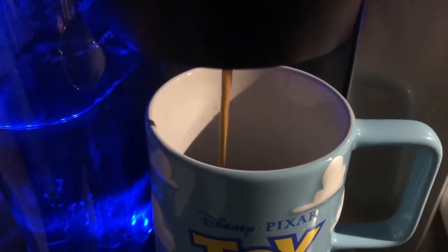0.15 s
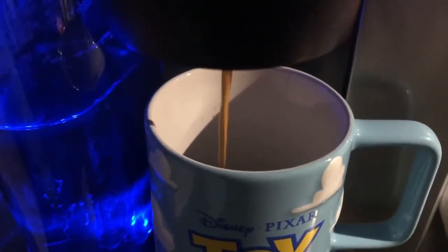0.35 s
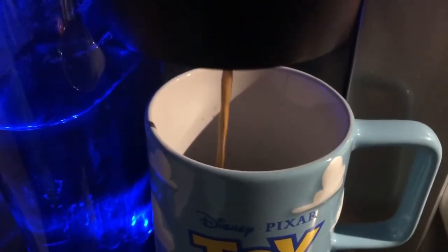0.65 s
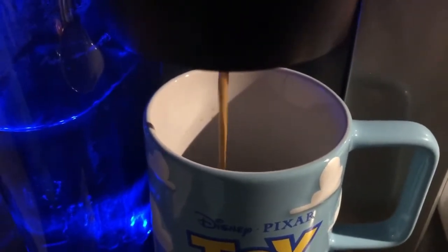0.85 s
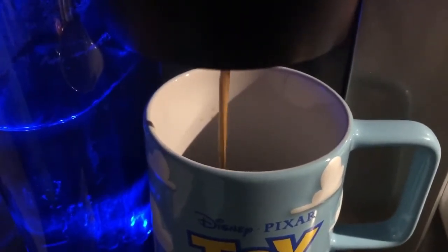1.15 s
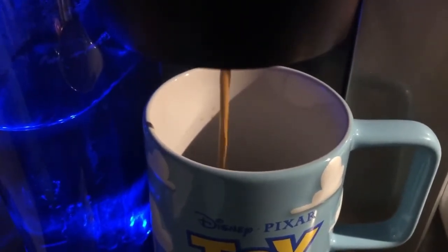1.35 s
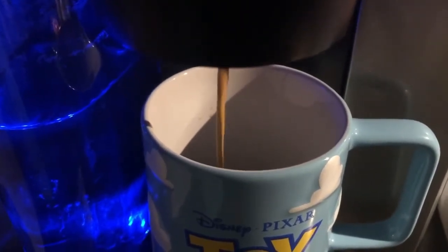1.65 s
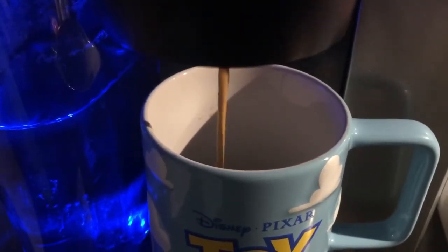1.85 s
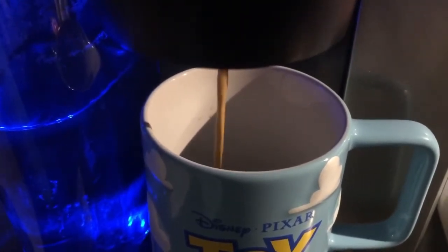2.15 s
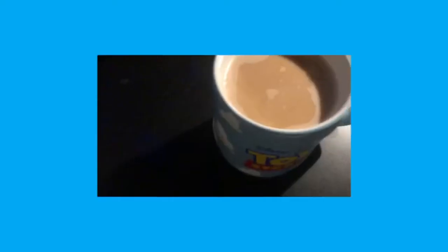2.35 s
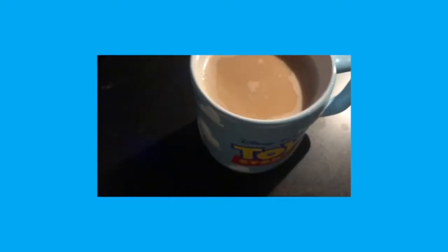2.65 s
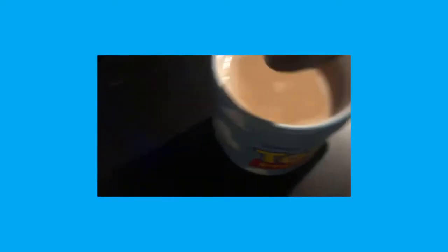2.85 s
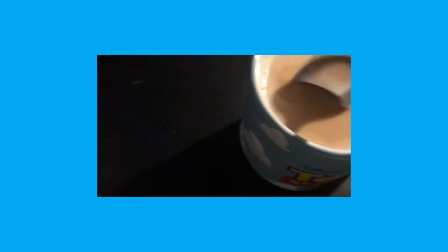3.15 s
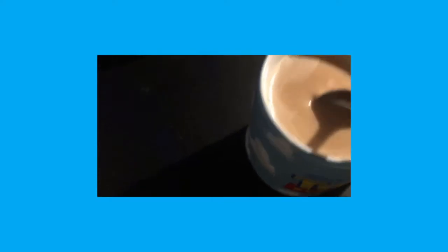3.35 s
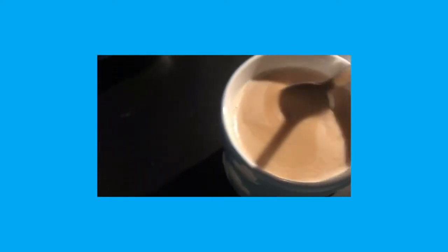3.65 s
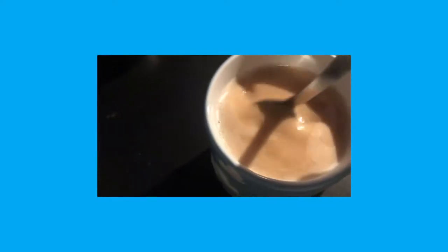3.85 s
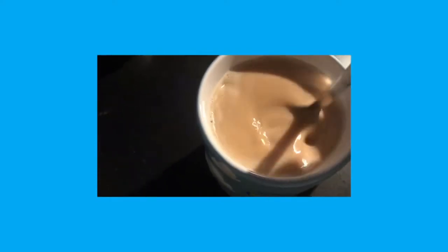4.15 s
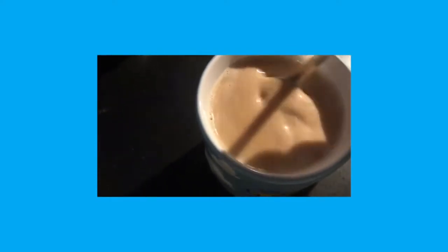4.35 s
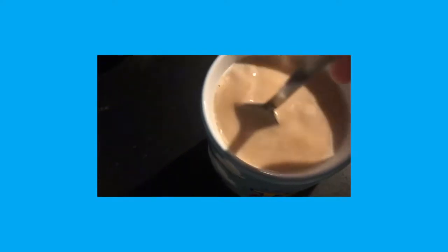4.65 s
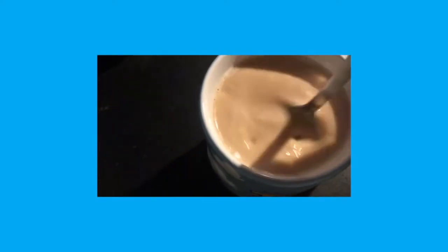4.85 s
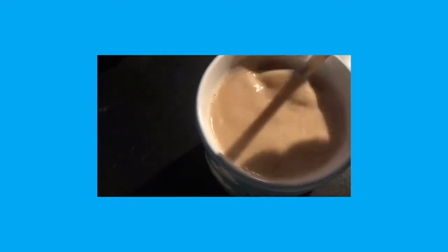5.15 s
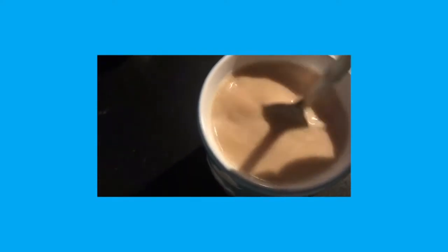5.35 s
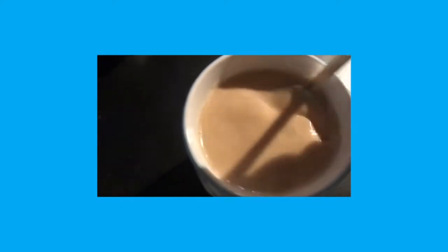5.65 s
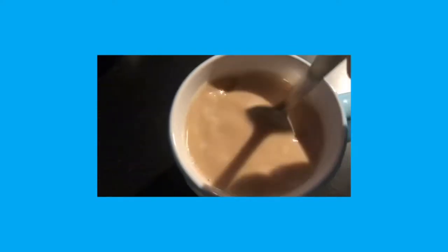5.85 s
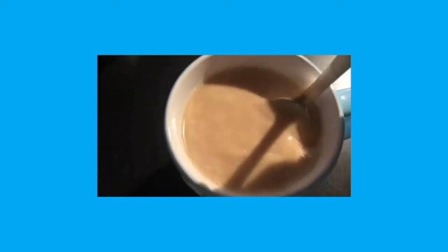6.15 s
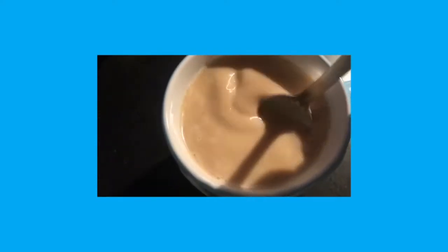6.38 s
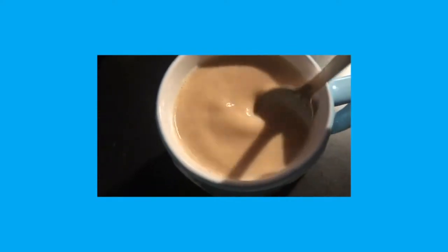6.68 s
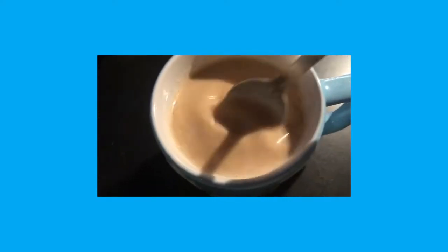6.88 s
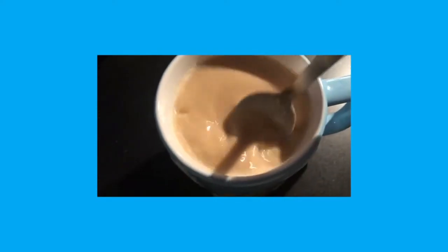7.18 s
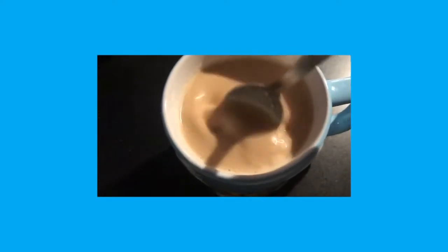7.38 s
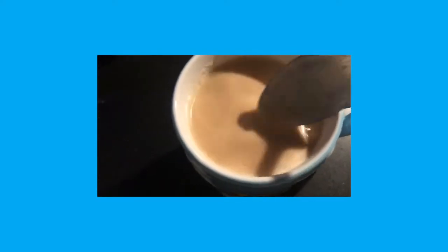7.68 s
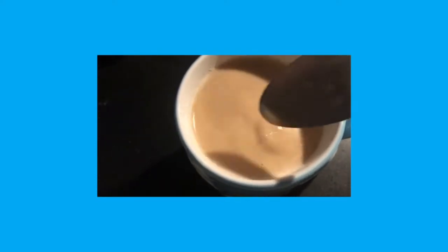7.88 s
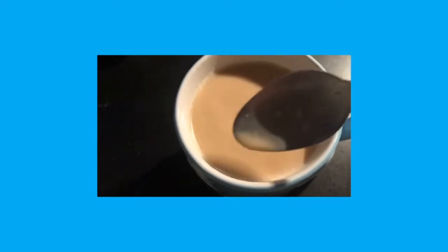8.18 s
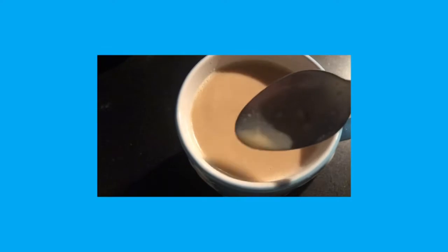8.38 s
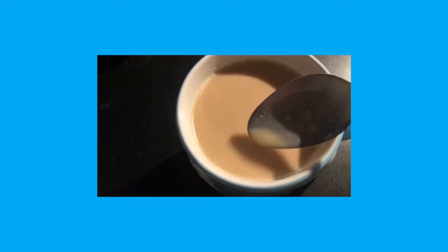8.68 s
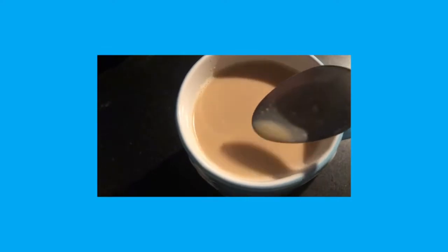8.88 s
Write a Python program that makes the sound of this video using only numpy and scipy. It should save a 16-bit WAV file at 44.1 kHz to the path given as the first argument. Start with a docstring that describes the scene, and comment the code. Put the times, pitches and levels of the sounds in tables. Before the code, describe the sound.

Coffee sputters and plops into a mug with crackling spray, cuts abruptly at two seconds, then quiet kitchen hum, a few spoon clinks and faint drips.

```python
"""In a kitchen, a thin stream of coffee sputters into a mug under a brewer: bubbles plop and ring the air in
the mug and its alcove, spits crackle, and a trickle, a spout hiss and a pump run along as shaped noise.
The scene then cuts to the quiet kitchen: a fridge hums, foam fizzes in tiny noise pops, a hand brushes and
ticks, a tap drips gliding tones, and a spoon clinks on the mug, setting off its fading wall modes."""
import sys
import numpy as np
from scipy import signal
from scipy.fft import rfft, irfft
from scipy.io import wavfile
from scipy.ndimage import uniform_filter1d

SR = 44100
rng = np.random.default_rng(int(sys.argv[2]) if len(sys.argv) > 2 else 0)


def transcribe(signal):
    """Save signal, clipped to [-1, 1], as a 16-bit WAV file at the path in sys.argv[1]."""
    frames = np.atleast_2d(signal).T
    limited = np.clip(frames, -1, 1)
    pcm = np.round(limited * 32767).astype(np.int16)
    wavfile.write(sys.argv[1], SR, pcm)


N = 397782
TIME_S = np.arange(N) / SR
POUR_END_S = 2.216
CROSS_T60_S = 0.028  # time for a cross mode of the mug's air to fade by 60 dB

# quiet kitchen: (time [s], fan band level [dB], foam fizz level [dB])
KITCHEN_LEVELS = [(2.22, -65, -61.5), (2.399, -69, -75), (3.1, -69, -73), (4.1, -68.5, -67.5),
                  (6.299, -62.5, -68.5), (8.1, -63, -71), (9.02, -62.5, -72.5)]


def amp(db):
    """Turn dB into a gain."""
    return 10 ** (np.asarray(db, float) / 20)


def coloured(table, db):
    """Noise whose spectrum follows (frequency [Hz], level [dB per Hz]) points, at an rms level in dB."""
    hz, shape = np.transpose(table)
    bin_hz = np.arange(N // 2 + 1) * SR / N
    gain = amp(np.interp(np.log(bin_hz + 1), np.log(hz), shape, -120, -120))
    x = irfft(rfft(rng.standard_normal(N)) * gain, N)
    return x * amp(db) / x.std()


def band(x, hz, width):
    """Two-pole resonance with gain 1 at its centre."""
    b, a = signal.iirpeak(min(hz, .45 * SR), max(hz / width, .3), SR)
    return signal.lfilter(b, a, x)


def double_band(x, hz, width):
    """The same resonance twice, for steeper sides."""
    return band(band(x, hz, width), hz, width)


def walk(rate):
    """Random wander: levels held for 1 / rate seconds, then smoothed twice; spread near 1."""
    hold = int(SR / rate)
    steps = np.repeat(rng.standard_normal(N // hold + 1), hold)
    return 1.1 * uniform_filter1d(uniform_filter1d(steps, hold), hold)[:N]


def ring(hz, db, t60, rise_s=0.00045, sign=1.):
    """Sum of fading tones that start together; sign -1 sets neighbours in opposite phase."""
    t = np.arange(int(1.223 * np.max(t60) * SR))[:, None] / SR
    tones = amp(db - 60 * t / t60) * np.sin(2 * np.pi * hz * t) * sign ** np.arange(len(hz))
    return tones.sum(axis=1) * (1 - np.exp(-t[:, 0] / rise_s))


def burst(hz, width, t60):
    """A short fading puff of noise, peak 1."""
    fade = amp(-60 * np.arange(1024) / SR / t60)
    x = double_band(rng.standard_normal(1024) * fade, hz, width)
    return x / np.abs(x).max()


def add(out, s, x):
    """Mix x in at time s."""
    i = int(s * SR)
    out[i:i + len(x)] += x[:len(out) - i]


def room(x, t60, db):
    """The kitchen answers with a short diffuse tail of fading noise."""
    t = np.arange(int(t60 * SR)) / SR
    tail = rng.standard_normal(len(t)) * amp(-60 * t / t60) * (t > .003)
    return x + amp(db) * signal.fftconvolve(x, tail / np.linalg.norm(tail))[:N]


def rumble():
    """Low background noise that wanders slowly in level."""
    # spectrum: (frequency [Hz], level [dB per Hz])
    rumble_spectrum = [(25, -28), (49, -6), (152, -3.5), (243, 1), (387, -11), (510, -21.5), (780, -22),
                       (4000, -38.5)]
    return coloured(rumble_spectrum, -52) * amp(1.4 * walk(3))


def fan():
    """A band of fan noise, with motor tones of steady pitch that waver in level."""
    s, level_db, _ = np.transpose(KITCHEN_LEVELS)
    fan_db = np.interp(TIME_S, s, level_db)
    out = coloured([(380, -27.5), (460, 1.5), (640, 0), (800, -15.0)], 0) * amp(fan_db)
    # motor tones: (frequency [Hz], level against the fan band [dB])
    motor_tones = [(510, 5.5), (594, 0)]
    for hz, db in motor_tones:
        out += amp(fan_db + db + 2.2 * walk(5.1)) * np.sin(2 * np.pi * hz * TIME_S)
    return out


def fridge_hum():
    """Narrow low bands of noise that hum."""
    # hum bands: (centre [Hz], distance to the -20 dB points [Hz], level [dB])
    hum_bands = [(61.2, 6.9, -59), (125.1, 11, -59)]
    return sum(coloured([(hz - width, -20), (hz, 0), (hz + width, -20)], db) for hz, width, db in hum_bands)


def whine():
    """A thin high tone comes and goes; a whir of wavering pitch swells half as much in dB."""
    # whine: (time [s], level [dB])
    whine_levels = [(2.2, -87.5), (3.0, -84.5), (3.4, -92.5), (6.4, -100), (6.8, -76), (9.02, -77.5)]
    whine_db = np.interp(TIME_S, *np.transpose(whine_levels))
    tone = amp(whine_db) * np.sin(2 * np.pi * 10012 * TIME_S)
    whir_hz = 2784 + 14 * walk(49)
    whir = amp(whine_db / 2 - 42) * np.sin(2 * np.pi * np.cumsum(whir_hz) / SR)
    return tone + whir


def foam():
    """Tiny bubbles pop at random: each lifts a steady hiss for a moment."""
    pops_per_s, pop_fade_s = 45, 0.0016
    # spectrum: (frequency [Hz], level [dB per Hz])
    fizz_spectrum = [(1760, -36.5), (3000, -8.5), (5610, -3.5), (15000, -5.5), (15800, -1)]
    s, _, level_db = np.transpose(KITCHEN_LEVELS)
    pop_size = amp(19.0 * np.minimum(rng.exponential(size=N), 1.5))
    pops = (rng.random(N) < pops_per_s / SR) * pop_size
    pops = signal.lfilter([1], [1, -np.exp(-1 / (pop_fade_s * SR))], pops)
    fizz_db = np.interp(TIME_S, s, level_db) + 0.77 * walk(16)
    return coloured(fizz_spectrum, 0) * (1 + 0.11 * pops) * amp(fizz_db)


def kitchen():
    """All the background of the quiet kitchen, faded in very quickly as the pour ends."""
    out = rumble() + fan() + fridge_hum() + whine() + foam()
    return out * np.clip((TIME_S - POUR_END_S) / 0.0023 + 1, 0, 1)


def drips():
    """A tap drips: each drip is a short bubble tone that starts at 880 Hz and glides up."""
    # drips: (time [s], level [dB])
    drip_times = [(4.279, -54.5), (5.819, -58), (7.343, -53), (8.931, -55.5)]
    out, t = np.zeros(N), np.arange(4096) / SR
    for s, db in drip_times:
        add(out, s, amp(db - 60 * t / 0.075) * np.sin(2 * np.pi * 880 * t * (1 + 0.99 * t)))
    return out


def ticks():
    """Knocks travel through the worktop, highs first and lows late, so each tick falls quickly in pitch."""
    glide_s, t60_s = 0.00073, 0.16
    # ticks: (time [s], level [dB], starting pitch [Hz])
    tick_times = [(3.273, -44.5, 3540), (3.286, -42.5, 4440), (3.357, -42.5, 2940)]
    out, t = np.zeros(N), np.arange(2048) / SR
    for s, db, hz in tick_times:
        cycles = hz * glide_s * np.log1p(t / glide_s)
        add(out, s, amp(db - 60 * t / t60_s) * np.sin(2 * np.pi * cycles))
    return out


def spoon_lift():
    """The spoon is picked up and rings faintly with a few high tones."""
    # ringing tones: frequency [Hz]
    lift_hz = [7300, 10000, 12040, 13760]
    out = np.zeros(N)
    add(out, 2.299, ring(np.array(lift_hz), -61, 0.12, rise_s=0.00005))
    return out


def brushes():
    """Something brushes along a surface: soft swells of noise, partly filtered round one pitch."""
    # brushes: (time [s], length [s], level before filtering [dB], centre [Hz])
    brush_times = [(2.725, 0.081, -53.5, 1400), (2.846, 0.12, -63.5, 2400), (3.519, 0.099, -63, 2140)]
    out = np.zeros(N)
    for s, length, db, hz in brush_times:
        noise = rng.standard_normal(int(length * SR))
        swell = np.hanning(len(noise)) ** 0.23
        add(out, s, amp(db) * swell * (3 * band(noise, hz, 0.8 * hz) + 0.42 * noise))
    return out


def handling():
    """A hand at work: ticks, the spoon being picked up, and brushing."""
    return ticks() + spoon_lift() + brushes()


def mug_wall(height, db, length):
    """A blow rings each wall mode less the further it lands from where that mode swings most."""
    # mug and spoon modes: (frequency [Hz], 60 dB fade time before the length factor [s], level [dB],
    # height where the mode swings most [0 bottom, 1 rim])
    mug_modes = [(1847, 0.068, -23.5, .6), (2133, 0.1, -16.5, 0.41), (2490, 0.044, -15, .1),
                 (2660, 0.059, -14.5, 0), (2885, 0.059, -14.5, .6), (3210, 0.26, -31, 0),
                 (3357, .05, -15.5, 0.77), (3460, 0.055, -20.5, 1.04), (3540, .09, -26, 0.536),
                 (4216, 0.048, -18, .6), (4800, .06, -26.5, 0.77), (5140, 0.26, -35, 1.1),
                 (5813, 0.025, -8.5, 0.14), (6440, .05, -35.5, 0.66), (6690, 0.02, -10, 0.075),
                 (7750, 0.085, -30.5, 0.86), (10600, .03, -39.5, 1)]
    hz, t60, mode_db, swing = np.transpose(mug_modes)
    fall_db = 38.5  # loss when struck a whole mug's height away
    modes = ring(hz, mode_db + db - fall_db * np.abs(height - swing), t60 * length, rise_s=0.00052, sign=-1.)
    # the first milliseconds are louder: spoon and coffee soak up most of the blow at once
    return modes * (1 + np.exp(-np.arange(len(modes)) / SR / 0.0081))


def lowest_ring(out, s, bell_db, angle, length, touch_s):
    """The lowest ring is a close pair, shared by angle; the spoon's second touch chokes it a little."""
    touch_db, touch_fall_s = -13, 0.0019
    linger = 0.55  # share of the unscaled decay rate that is given back after the touch
    # close pair: (frequency [Hz], 60 dB fade time before the length factor [s])
    bell_pair = [(2172, 0.21), (2249, 0.4)]
    for (hz, t60), share in zip(bell_pair, (np.cos(angle), np.sin(angle))):
        bell = ring(np.array([hz]), bell_db, t60 * length)
        since = np.maximum(np.arange(len(bell)) / SR - touch_s, 0)
        choke_db = touch_db * np.minimum(since / touch_fall_s, 1)
        add(out, s, share * bell * amp(choke_db + linger * 60 * since / t60))


def wash(out, s, crack_db, height):
    """A bright rattle of noise follows the crack, weaker towards the rim."""
    # rattle bands: centre [Hz]
    wash_hz = [2590, 6485]
    t = np.arange(8192) / SR
    for hz in wash_hz:
        fade = amp(crack_db - 16 - 8.5 * height - 60 * t / 0.21)
        add(out, s, fade * double_band(rng.standard_normal(len(t)), hz, hz / 2))


def spoon():
    """Each clink rings the mug, with a contact crack, a bright wash and a dull knock."""
    # clinks: (time [s], height struck [0 bottom, 1 rim], wall mode level [dB], contact crack level [dB],
    # lowest ring level [dB], angle round the wall [rad], ring length factor,
    # time until the spoon touches again [s])
    clink_times = [(2.261, 0, -43.5, -58, -70, 0.42, 1.5, .3),
                   (4.5095, 0.05, -1, -12.5, -33.5, 0.22, 0.79, .3),
                   (6.621, 0.32, -7.5, -24, -30.5, 0.75, 0.89, .077),
                   (7.612, 0.69, -12.5, -36, -31, 0.21, 0.97, .085),
                   (7.695, 0.7, -35, -52, -50, 0.25, .6, .3),
                   (8.6909, 0.91, -17, -26, -45.5, 0.56, 1.13, .4)]
    out = np.zeros(N)
    for s, height, db, crack_db, bell_db, angle, length, touch_s in clink_times:
        add(out, s, mug_wall(height, db, length))
        lowest_ring(out, s, bell_db, angle, length, touch_s)
        add(out, s, amp(crack_db) * burst(6500, 14000, 0.02))
        wash(out, s, crack_db, height)
        add(out, s, amp(bell_db - 7) * burst(800, 650, 0.035))  # dull knock
    return out


def trickle():
    """The steady stream, as noise that flutters in level."""
    # spectrum: (frequency [Hz], level [dB per Hz])
    stream_spectrum = [(400, -20), (780, 1.5), (1250, -13), (1500, -14), (6000, -31), (8400, -23.5),
                       (15700, -43)]
    return coloured(stream_spectrum, -44) * amp(3.1 * walk(25))


def pump():
    """The pump, as steady low noise."""
    # spectrum: (frequency [Hz], level [dB per Hz])
    pump_spectrum = [(60, -10), (140, -3), (300, -6), (600, -8)]
    return coloured(pump_spectrum, -44)


def spout():
    """The brewer's spout hisses through a few resonances, with random spatters that lift the hiss."""
    # resonances: (centre [Hz], width of each of two passes [Hz], gain [dB])
    spout_bands = [(1722, 400, -1), (2580, 500, -1), (4140, 690, 0.5), (4850, 330, 0), (5600, 910, -4)]
    # hiss: (time [s], level before a 5 dB cut, flutter and spatter [dB])
    spout_levels = [(0, -49), (.3, -45.5), (0.602, -46.5), (.8, -70.5), (1.03, -45), (1.3, -66.5),
                    (2.2, -45)]
    hiss = sum(amp(db) * double_band(rng.standard_normal(N), hz, width) for hz, width, db in spout_bands)
    spatters_per_s = 250
    hits = (rng.random(N) < spatters_per_s / SR) * rng.exponential(size=N)
    spatter = 1 + 1.2 * signal.lfilter([1], [1, -.985], hits)
    level_db = np.interp(TIME_S, *np.transpose(spout_levels)) - 5 + 2.4 * walk(30)
    return spatter * hiss / hiss.std() * amp(level_db)


def plop(db, pitch_hz, t60):
    """A trapped bubble pulses for a few cycles, gliding up, and drives the low air modes."""
    # low modes of the air over the coffee: (frequency [Hz], level [dB], 60 dB fade time [s])
    low_modes = [(771, 0.5, 0.059), (877, 1.5, 0.043), (1018, 7.5, 0.03), (1176, 6.5, 0.026)]
    hz, mode_db, mode_t60 = np.transpose(low_modes)
    t, chance = np.arange(2048) / SR, rng.standard_normal((2, len(hz)))
    bubble = amp(-60 * t / max(t60, .004)) * np.sin(2 * np.pi * pitch_hz * t * (1 + 0.3 * t))
    modes = ring(hz * (1 + .009 * chance[0]), mode_db + 2.8 * chance[1], mode_t60)
    x = signal.fftconvolve(bubble, modes)
    x /= np.abs(x).max()
    add(x, 0, 0.33 * bubble)
    return amp(db) * x / np.abs(x).max()


def spit(db, centre_hz):
    """A droplet cracks and sets off the high air modes round its own pitch."""
    # high modes of the air over the coffee: (frequency [Hz], level [dB], 60 dB fade time [s])
    top_modes = [(2833, -4.5, 0.011), (4890, -7, 0.027), (6400, -5, 0.02), (8350, 2.5, 0.011),
                 (11010, -2, 0.011)]
    hz, mode_db, t60 = np.transpose(top_modes)
    chance = rng.standard_normal((2, len(hz)))
    x = 1.2 * burst(centre_hz, 0.93 * centre_hz, 0.017)
    # modes far from the droplet's pitch are weaker
    level_db = mode_db - 22 * np.abs(np.log(hz / centre_hz)) + 2.3 * chance[1]
    modes = ring(hz * (1 + 0.018 * chance[0]), level_db, t60, rise_s=0.0001)
    add(x, 0, modes / np.abs(modes).max())
    return amp(db) * x


def loud_plops(out):
    """The clear bubbles of the stream, each with a faint spit."""
    bubble_cycles = 21  # a bubble fades by 60 dB in this many cycles
    # plops: (time [s], peak level [dB], bubble pitch [Hz])
    plop_times = [(0.059, -16.5, 1110), (0.133, -15, 940), (0.191, -9, 706), (0.271, -19.5, 1140),
                  (0.336, -11.5, 815), (0.464, -18, 770), (0.491, -21, 830), (0.51, -20, 686),
                  (0.532, -7.5, 883), (0.604, -13.5, 823), (0.717, -20.5, 1260), (0.767, -11.5, 1190),
                  (0.835, -10.5, 788), (0.915, -20.5, 797), (0.952, -23, 790), (0.99, -19, 940),
                  (1.113, -22.5, 905), (1.156, -26, 700), (1.178, -21, 686), (1.211, -16.5, 907),
                  (1.259, -18, 870), (1.322, -17, 920), (1.338, -15, 1190), (1.41, -22.5, 1150),
                  (1.429, -14.5, 876), (1.565, -18, 760), (1.622, -10, 732), (1.731, -10, 746),
                  (1.775, -5, 727), (1.81, -15, 830), (1.927, -14.5, 764), (1.965, -18.5, 758),
                  (1.992, -19.5, 930), (2.046, -18, 760)]
    for s, db, hz in plop_times:
        add(out, s, plop(db, hz, bubble_cycles / hz))
        add(out, s, spit(db - 21, 4000))


def taps(out):
    """Drops that ring a cross mode of the air, each with a faint spit."""
    # drops: (time [s], level [dB], pitch [Hz])
    tap_times = [(0.0592, -17.5, 3650), (0.11, -22.5, 3860), (0.2962, -22, 2520), (0.532, -23, 3660),
                 (0.6037, -22, 2520), (0.8213, -17.5, 3650), (1.2238, -22.5, 3740), (1.7462, -17, 3730),
                 (1.8707, -20.5, 2600), (2.0782, -19, 3800)]
    for s, db, hz in tap_times:
        add(out, s, ring(np.array([hz]), db, CROSS_T60_S))
        add(out, s, spit(db - 19.5, 9020))


def loud_spits(out):
    """The clear crackles of spray."""
    # spits: (time [s], level [dB], centre [Hz])
    spit_times = [(0.0315, -24.5, 8800), (0.1324, -19.5, 8500), (0.3208, -21, 8000), (0.7666, -24.5, 8200),
                  (0.82, -26, 10900), (1.21, -28.5, 11800), (1.3194, -26, 5600), (1.554, -28, 4700),
                  (1.5807, -29.5, 5500), (1.688, -23, 6360), (1.704, -19.5, 8500), (1.7946, -19.5, 7700),
                  (1.935, -25, 5840), (1.9644, -23, 7800), (2.1563, -17.5, 8200)]
    for s, db, hz in spit_times:
        add(out, s, spit(db, hz))


def small_drops(out):
    """A crowd of 230 small drops at random times, each a plop, a cross mode ring and a spit."""
    # the two cross modes: frequency [Hz]
    cross_hz = [2476, 3685]
    for place, chance, pitch, cross, spray, stray, size in rng.random((230, 7)):
        s = place * POUR_END_S
        db = -3.5 * np.log(0.048 + chance)  # a few are much louder than the rest
        add(out, s, plop(-33 + db, 650 * 2.1 ** pitch, 0.03 * size))
        ring_hz = cross_hz[int(cross > 0.3)] * (.985 + 0.035 * spray)
        add(out, s, ring(np.array([ring_hz]), -30 + db - 20 * stray, CROSS_T60_S * (.5 + size)))
        add(out, s + 0.03 * stray, spit(-40.5 + db, 1600 * 8 ** spray))


def pour():
    """Everything in the coffee stream together, cut off at the end of the pour."""
    out = trickle() + pump() + spout()
    loud_plops(out)
    taps(out)
    loud_spits(out)
    small_drops(out)
    return out * np.clip((POUR_END_S - TIME_S) / 0.0048, 0, 1)


def scene():
    """The pour, then the quiet kitchen with the spoon, drips and handling echoing in the room."""
    echoing = room(spoon() + drips() + handling(), t60=0.64, db=-28.5)
    return (pour() + echoing + kitchen())[None]


def record(dry):
    """A steep low-pass filter removes the treble above 16.6 kHz."""
    return signal.sosfilt(signal.ellip(8, .2, 70, 16600, fs=SR, output="sos"), dry)


dry = scene()
out = record(dry)
transcribe(out)
```